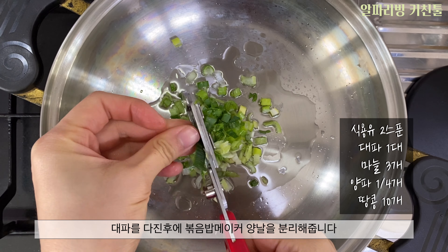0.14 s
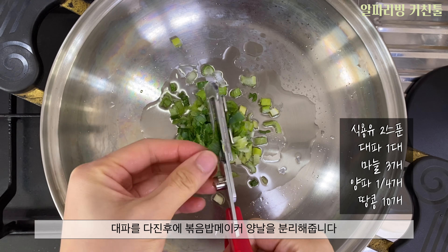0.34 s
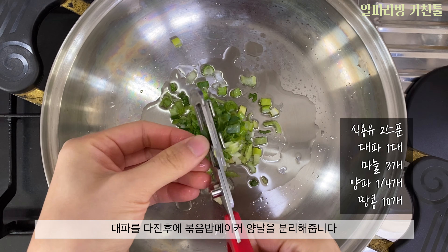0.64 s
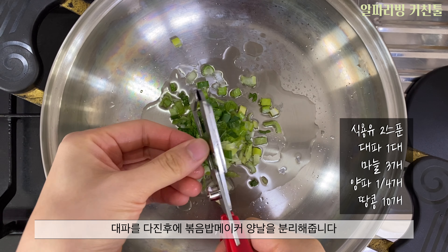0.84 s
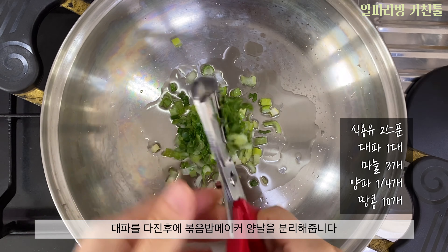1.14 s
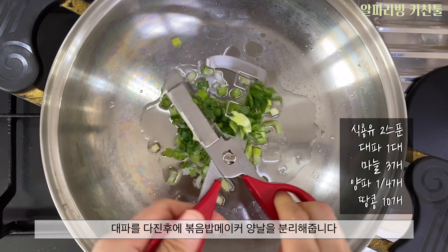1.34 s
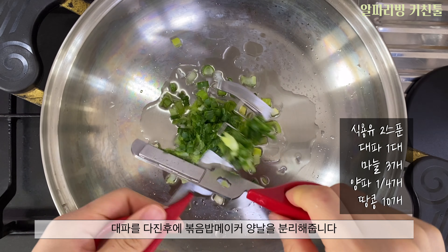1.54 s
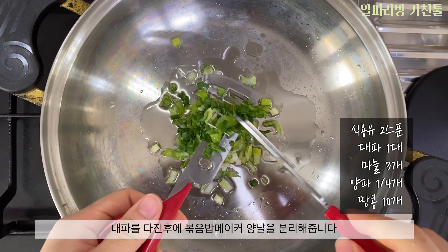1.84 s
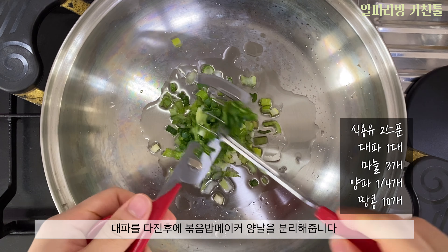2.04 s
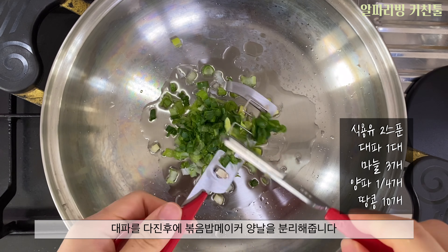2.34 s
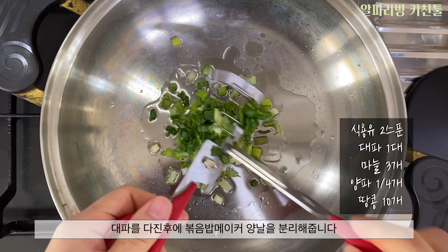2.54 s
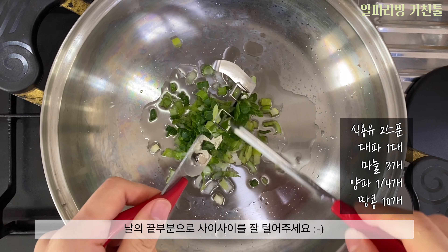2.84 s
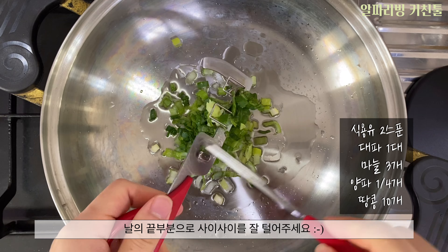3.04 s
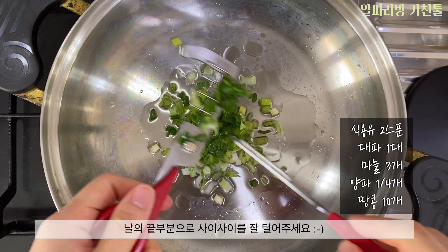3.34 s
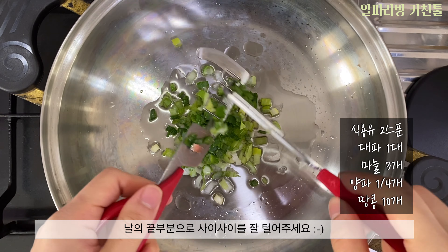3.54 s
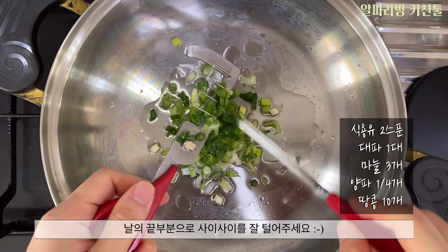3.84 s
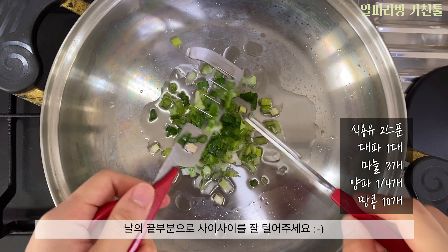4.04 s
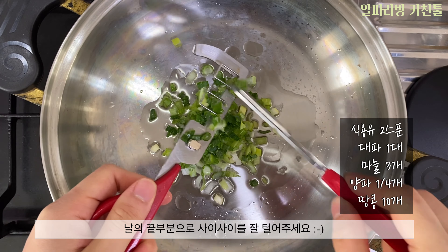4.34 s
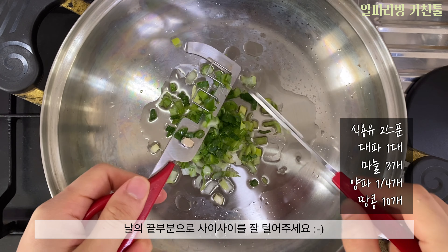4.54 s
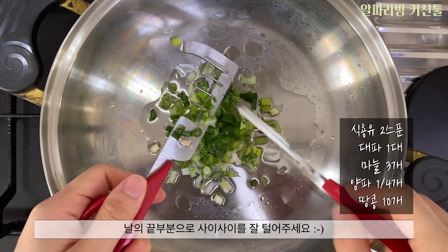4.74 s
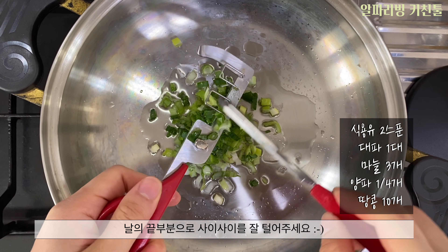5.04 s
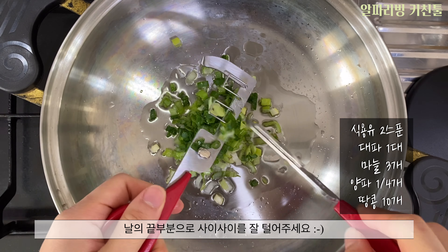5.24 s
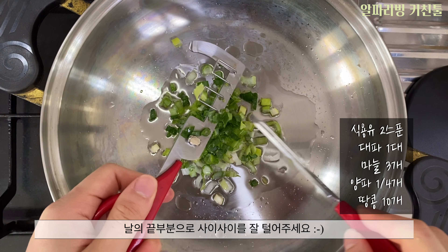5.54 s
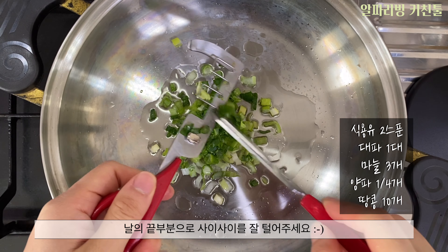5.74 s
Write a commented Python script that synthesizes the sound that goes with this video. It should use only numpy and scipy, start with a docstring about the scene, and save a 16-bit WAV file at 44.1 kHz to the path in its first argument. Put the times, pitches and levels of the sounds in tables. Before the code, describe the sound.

Kitchen scissors softly snip green onion, then their separated steel blades tap and scrape together over a pot, above a faint hum.

```python
"""Kitchen scissors snip softly through green onion over a steel pot. They come apart, and one blade is
tapped and scraped along the other to shake the pieces off: each contact rings the steel, and the pot
and the room throw it back. Underneath sit a faint appliance hum, a rustle of hands and a few dull,
distant knocks. Near the end a low thud comes through the counter."""
import sys
import numpy as np
from scipy import signal
from scipy.fft import rfft, irfft, next_fast_len
from scipy.io import wavfile
from scipy.ndimage import uniform_filter1d

SR = 44100
rng = np.random.default_rng(int(sys.argv[2]) if len(sys.argv) > 2 else 0)


def bounce(signal):
    """Save signal as a 16-bit WAV file at the path given by the first command-line argument."""
    frames = np.transpose(np.atleast_2d(signal))
    limited = np.clip(frames, -1, 1)
    pcm = np.round(limited * 32767).astype(np.int16)
    wavfile.write(sys.argv[1], SR, pcm)


N = 260190

# steel meeting steel: start_s, level_db, low_ring_db, tip_brightness_db
BLADE_TAPS = [(0.1442, -51, 0, -16), (.147, -49, 7, 17), (0.1555, -45.5, 2.5, 16), (0.364, -57.5, 5.5, -16),
              (.378, -47.5, 5, 2), (0.5353, -59.5, 9, -6), (.579, -49, 2, -2), (0.5903, -50, 11, 11),
              (.717, -55.5, 2, -10), (.7313, -47.5, 1, 0), (.951, -60, -5, -1), (0.969, -56.5, -3.5, -3),
              (.977, -49, 5, 12), (0.9894, -42.5, -0.5, 3), (1.117, -41, -1, 10), (1.1563, -44.5, 1.5, -6),
              (1.2792, -37.5, 0, -8.5), (1.459, -33.5, 7, -8), (1.4816, -48, 5, -4), (1.519, -48.5, 7, -6),
              (1.702, -23.5, 5, 5.5), (1.7276, -20, 3, 1), (1.8705, -49.5, 3, -2), (1.9882, -35, -5.5, 0.5),
              (2.0168, -51, -5, -1), (2.0342, -28, -1, 1), (2.129, -56.5, -11, -15),
              (2.1457, -28.5, -10.5, -0.5), (2.1671, -31, -9, -0.5), (2.2521, -17, -4, 0.5),
              (2.3801, -44, 2.5, 9), (2.3965, -18, -3, 1), (2.4033, -34.5, 4.5, 7), (2.415, -41, -10, 0),
              (2.496, -56.5, 11.5, 10), (2.5014, -47.5, -1, 6), (2.519, -19.5, -4, 5.5),
              (2.622, -53, 14.5, 8), (2.628, -57, 4, 4.5), (2.6442, -19, 1.5, -3.5), (2.729, -45, -12, 6),
              (2.7386, -45, -13, -2), (2.7529, -31, 2.5, 2), (2.8498, -44, 1, 6), (2.8721, -37, -9.5, 9),
              (3.0075, -23.5, -5, 2), (3.0428, -43.5, -1.5, -8.5), (3.1461, -43.5, -8, -2),
              (3.157, -44.5, 2.5, 1), (3.1976, -52.5, 10, 15), (3.205, -57, 3, 17), (3.2947, -32, -12.5, 5),
              (3.3166, -23.5, -6.5, 5.5), (3.4296, -28, 4, -6.5), (3.508, -53, 4, -3),
              (3.515, -41.5, 1, 5.5), (3.5433, -18.5, -5, -4.5), (3.6497, -18.5, -4.5, 1.5),
              (3.6725, -32, -5.5, -1), (3.768, -40, 7.5, -6), (3.8928, -36, 5, -15),
              (3.921, -40.5, -2, -21), (3.9981, -46, 9, -10.5), (4.1248, -18.5, -6, -6.5),
              (4.155, -45, -18, -4.5), (4.238, -21.5, -7.5, -1.5), (4.3523, -49, 4.5, -7),
              (4.4571, -44, 5.5, -11), (4.4786, -49, -1, 8), (4.4847, -43.5, -6, 0),
              (4.5913, -16.5, -7.5, 0.5), (4.704, -19.5, -7, 1.5), (4.8209, -38.5, 3.5, -7),
              (4.8294, -36, -17, 18), (4.837, -30, -11, -0.5), (4.9285, -44.5, -9.5, 3),
              (5.0502, -50.5, -8, -6.5), (5.07, -17.5, -13, -3), (5.1743, -48.5, -8.5, -4),
              (5.2078, -40, 7.5, 10), (5.2957, -55, 1, 2), (5.3343, -18.5, -12, -2),
              (5.4597, -47.5, -4, -4.5), (5.476, -19, -14, -0.5), (5.5896, -48, -7, -10),
              (5.5995, -49, -7.5, 2), (5.73, -14, -12, -1), (5.8524, -38, -11, -3),
              (5.8576, -26, -13.5, -6), (5.8645, -28, -12, 3)]
# how alike distant sound is left and right: frequency_hz, correlation
FAR_CORRELATION = [(60, 0.99), (180, 1), (350, 0.57), (600, 0.59), (1500, -0.5), (5000, .15),
                   (15000, -0.35)]


def amp(db):
    return 10 ** (np.asarray(db) / 20)


def unit_rms(x):
    return x / np.sqrt(np.mean(x ** 2) + 1e-20)


def curve_at(points, hz):
    """Read a breakpoint curve along a log frequency axis."""
    points_hz, value = np.transpose(points)
    return np.interp(np.log(hz + 1), np.log(points_hz + 1), value)


def add(mix, start_s, sound):
    part = mix[..., round(start_s * SR):][..., :sound.shape[-1]]
    part += sound[..., :part.shape[-1]]


def stereo_pair(a, b, correlation):
    """Blend two independent noises into a partly alike left and right."""
    return np.array([a, correlation * a + np.sqrt(1 - correlation ** 2) * b])


def diffuse_noise(colour, patchy_db):
    """Wide noise with patches that swell and fade across its spectrum."""
    frames, hz = N // 256 + 5, np.fft.rfftfreq(1024, 1 / SR)
    a, b, c, d, patches = rng.standard_normal((frames, 513, 5)).T
    patches = unit_rms(uniform_filter1d(uniform_filter1d(patches, size=10, axis=0), size=10, axis=1))
    spectra = stereo_pair(a + 1j * b, c + 1j * d, curve_at(FAR_CORRELATION, hz)[:, None])
    spectra *= amp(curve_at(colour, hz)[:, None] + patchy_db * patches)
    return unit_rms(signal.istft(spectra, nperseg=1024, noverlap=768)[1][:, :N])


def room_tone():
    """The low, airy bed of the kitchen."""
    # colour of the air: frequency_hz, gain_db
    air_colour = [(18, -61.5), (30, -59.5), (118, -2), (228, -3.5), (279, -12.5), (388, -16.5), (572, -10),
                  (1320, -20), (1760, -18.5), (3070, -29.5), (4000, -25.5), (5200, -30), (8800, -120)]
    return amp(-66.5) * diffuse_noise(air_colour, patchy_db=3.5)


def appliance_hum():
    """An appliance hums in wavering lines: noise through narrow resonances."""
    # hum lines: pitch_hz, bandwidth_hz, level_db
    hum_lines = [(283.8, 8.2, -65.5), (576, 18, -79.5), (667.7, 20, -82)]
    out = np.zeros(N)
    for pitch_hz, bandwidth_hz, level_db in hum_lines:
        pole = np.exp((2j * pitch_hz - bandwidth_hz) * np.pi / SR)
        line = signal.lfilter([1], [1, -pole], rng.standard_normal(N)).real
        out += amp(level_db) * unit_rms(line)
    return out


def hand_rustle():
    """Hands and onion make a faint, gritty hiss that comes and goes."""
    # fader moves of the rustle: time_s, level_db
    fader = [(0.0, -73.5), (0.15, -78.5), (0.62, -77), (1.02, -91), (1.22, -72.5), (1.82, -87), (2.41, -80),
             (2.61, -79), (2.86, -83.5), (3.04, -83), (3.53, -70), (4.37, -71), (5.01, -83), (5.26, -64.5),
             (5.39, -78), (5.55, -95), (5.78, -83), (5.9, -70)]
    # colour of the hiss: frequency_hz, gain_db
    hiss_colour = [(880, -39.5), (1500, -18.5), (2790, -29), (3420, 2), (3780, -13), (6090, 1.5),
                   (14000, -2), (17000, -8.5)]
    level_db = np.interp(np.arange(N) / SR, *np.transpose(fader))
    grit_db = 2 * unit_rms(uniform_filter1d(rng.standard_normal(N), size=150))
    return amp(level_db + grit_db) * diffuse_noise(hiss_colour, patchy_db=1.5)


def distant_knocks():
    """Dull knocks across the kitchen: puffs of band noise with a quick rise and a roomy fall."""
    # knock cues: start_s, level_db, centre_hz, width_octaves, rise_s, t60_s
    knocks = [(.185, -50, 1310, 1.26, 0.011, 0.11), (0.672, -52.5, 122, 0.55, 0.006, 0.29),
              (.802, -45, 970, 1.75, 0.0061, 0.14), (.805, -43, 286.5, 0.09, 0.0094, 0.18),
              (.808, -49, 2200, 0.17, 0.0047, 0.11), (1.5, -56, 601, 0.12, 0.0029, 0.27),
              (1.8, -65, 625, 0.38, 0.0078, 0.11), (2.701, -59, 510, 0.28, 0.0044, 0.046),
              (2.271, -45.5, 2920, 1.8, 0.047, 0.3), (5.12, -52.5, 390, 1.8, 0.028, 0.44),
              (5.237, -39.5, 1604, 1.43, 0.0055, 0.21), (5.489, -52.5, 118, 1.17, 0.029, 0.97),
              (5.56, -41.5, 687, 1.1, 0.035, 0.19), (5.742, -42, 510, 1.44, 0.0081, 0.22)]
    out, t = np.zeros((2, N)), np.arange(16384) / SR
    hz = np.fft.rfftfreq(len(t), 1 / SR) + 1
    correlation = curve_at(FAR_CORRELATION, hz)
    for start_s, level_db, centre_hz, width_octaves, rise_s, t60_s in knocks:
        noise = stereo_pair(*rfft(rng.standard_normal((2, len(t)))), correlation)
        band = np.exp(-(np.log2(hz / centre_hz) / width_octaves) ** 2)
        envelope = amp(level_db - 60 * t / t60_s) * (1 - np.exp(-(t / rise_s) ** 2))
        add(out, start_s, envelope * unit_rms(irfft(band * noise)))
    return out


def counter_thud(start_s=5.7385, level_db=-28):
    """A soft blow rings the low modes of the counter, dead centre."""
    # counter modes: pitch_hz, gain_db, t60_s
    modes = [(125, -3.5, 0.38), (172.7, 4.5, 0.26), (211.3, -5, 0.32), (273, -6, 0.29), (531, -18, .15)]
    out, t = np.zeros(N), np.arange(12000) / SR
    ring = sum(amp(db - 60 * t / t60_s) * np.sin(2 * np.pi * hz * t) for hz, db, t60_s in modes)
    attack = 1 - np.exp(-t / .003)
    add(out, start_s, amp(level_db) * ring * attack)
    return out


def room_reverb(sound, level_db=-14.5, predelay_s=.008):
    """The room answers with dense echoes whose lows outlast the treble."""
    # room decay: frequency_hz, t60_s
    decay = [(500, 0.76), (2500, 0.17), (7000, 0.15), (15000, 0.17)]
    hz, t, spectra = signal.stft(rng.standard_normal((2, SR)), SR, nperseg=128)
    spectra *= amp(-60 * t / curve_at(decay, hz)[:, None])
    echoes = signal.istft(spectra, SR, nperseg=128)[1]
    echoes *= np.clip(np.arange(echoes.shape[1]) / (predelay_s * SR) - 1, 0, 1)
    echoes *= amp(level_db) / np.linalg.norm(echoes[0])
    return signal.oaconvolve(sound.mean(0)[None], echoes, axes=1)[:, :N]


def pot_reflections(size, level_db=-7.5, t60_s=.039):
    """Spectrum of the steel pot's quick splash of echoes, new for each place of the blades."""
    t = np.arange(4000) / SR
    envelope = amp(-60 * t / t60_s) * np.clip(t / .0023, 0, 1)
    echoes = stereo_pair(*rng.standard_normal((2, len(t))), correlation=.82) * envelope
    return amp(level_db) * rfft(echoes / np.linalg.norm(echoes[0]), size)


def ring_blades(contact, knock_db, low_db, body_db, tip_db):
    """A contact rings four groups of blade modes over the pot; grip and place shift them each time."""
    # blade modes, from dull knock to bright tip: pitch_hz, gain_db, t60_s
    knock_modes = [(1571, -0.5, 0.016), (2173, 3.5, 0.0054), (2653, 3, 0.0089), (3410, 0, 0.0026)]
    low_modes = [(4394, -4.5, 0.017), (5012, 0.5, 0.011), (5360, -1.5, 0.0032), (5926, -5.5, 0.0044),
                 (6715, -4.5, 0.0079), (7170, -5, 0.0031)]
    body_modes = [(8310, -10.5, 0.0039), (9690, -8, 0.013), (9820, -5, 0.005), (10366, -4.5, 0.0074),
                  (10900, -10.5, 0.0023)]
    tip_modes = [(12260, -12.5, .004), (13350, -7.5, 0.0059), (13900, -6.5, 0.0089), (13750, -17, 0.0034),
                 (15100, -13.5, .007)]
    groups = [(knock_modes, knock_db), (low_modes, low_db), (body_modes, body_db), (tip_modes, tip_db)]
    size = next_fast_len(len(contact) + 6000)
    hz = np.fft.rfftfreq(size, 1 / SR)
    force, steel = rfft(contact, size), 0
    # hard steel spreads its force evenly over the treble
    force /= (uniform_filter1d(abs(force) ** 2, size=25) + 1e-12) ** .4
    force /= (1 - 1j * 1200 / (hz + 1)) ** 2  # a small blade sends out no bass
    for modes, group_db in groups:
        pitch_hz, gain_db, t60_s = np.transpose(modes)[:, :, None]
        detune, gain_jitter = rng.standard_normal((2, len(modes), 1))
        offset_hz = hz - pitch_hz * (1 + .015 * detune)
        resonance = 1 / (1 + 2j * np.pi * offset_hz * t60_s / 9.23) ** 2  # two poles: steep skirts
        ring = force * (amp(gain_db + 2 * gain_jitter) * resonance).sum(0)
        steel += amp(group_db) * ring / np.linalg.norm(ring)
    left_lead_s = 2.2e-5
    pan = np.exp(1j * np.pi * hz * left_lead_s * np.array([[1], [-1]]))
    spectrum = steel * pan * (1 + pot_reflections(size))
    return irfft(spectrum, size)[:, :size - 1500] * np.sqrt(size / 2)


def blade_slides():
    """Blades scrape on each other and through the onion in a gritty train of contacts."""
    # strokes: start_s, length_s, level_db
    slides = [(.124, 0.066, -60), (0.401, 0.054, -69.5), (0.553, 0.081, -67.5), (0.676, 0.065, -72),
              (0.979, 0.037, -62.5), (1.086, 0.077, -73.5), (1.278, 0.025, -63), (1.329, 0.17, -76),
              (1.461, 0.082, -60), (1.613, 0.088, -81.5), (1.698, 0.054, -52.5), (1.959, .06, -62),
              (2.16, .015, -63), (2.25, 0.09, -77), (2.396, 0.024, -45.5), (2.514, 0.02, -41.5),
              (2.65, .024, -68), (2.68, 0.057, -69), (3.017, 0.039, -52), (3.083, 0.062, -67.5),
              (3.498, 0.038, -59.5), (3.549, 0.033, -60), (3.65, 0.016, -36), (3.768, 0.023, -56.5),
              (3.888, 0.033, -44), (4.001, 0.031, -61.5), (4.115, 0.036, -48.5), (4.237, .02, -53),
              (4.362, 0.12, -79.5), (4.456, .029, -59), (4.593, 0.022, -51), (4.704, 0.03, -42.5),
              (4.82, 0.013, -42), (4.918, 0.051, -61.5), (5.06, .045, -61), (5.343, 0.045, -59),
              (5.48, 0.032, -59), (5.733, 0.044, -47), (5.852, .023, -48)]
    out = np.zeros((2, N))
    for start_s, length_s, level_db in slides:
        nearest_tap = min(BLADE_TAPS, key=lambda tap: abs(tap[0] - start_s))
        low_ring_db = .6 * nearest_tap[2]
        samples = round(length_s * SR)
        grit = amp(1.5 * np.minimum(rng.exponential(1, 200), 4)).repeat(40)[:samples]
        stroke = signal.windows.tukey(samples, .5) * grit * rng.standard_normal(8000)[:samples]
        scrape = ring_blades(stroke, knock_db=.65 * low_ring_db - 11, low_db=low_ring_db - 4.5,
                             body_db=-4, tip_db=-6)
        add(out, start_s, amp(level_db) * np.sqrt(samples) * scrape)
    return out


def blade_taps(apart_s=1.8, firm_tap_db=-25):
    """Steel strikes steel: one short burst of contacts sets the blades ringing."""
    out, t = np.zeros((2, N)), np.arange(400) / SR
    for start_s, level_db, low_ring_db, brightness_db in BLADE_TAPS:
        contact_s = .00038 * np.exp(.19 * rng.standard_normal())
        burst = rng.standard_normal(len(t)) * np.exp(-t / contact_s) * (1 - np.exp(-t * 5000))
        # the dull knock goes with the low ring and against the bright tip
        knock_db = -18.5 + .65 * low_ring_db - .2 * brightness_db
        knock_db += .14 * (firm_tap_db - level_db)  # soft taps knock more
        if start_s < apart_s:
            knock_db -= 5  # joined halves knock less
        click = ring_blades(burst, knock_db, low_db=low_ring_db - 6.5,
                            body_db=-7 - brightness_db / 2, tip_db=-6 + brightness_db / 2)
        add(out, start_s - .0002, amp(level_db) * np.sqrt(150) * click)
    return out


def scene():
    """Close scissors and their room reverb, over the quiet kitchen."""
    scissors = blade_taps() + blade_slides()
    return (scissors + room_reverb(scissors) + hand_rustle() + distant_knocks() + counter_thud()
            + appliance_hum() + room_tone())


def record(dry):
    """The microphone drops the lowest bass and the very top of the treble."""
    low_cut = signal.butter(2, 60, "high", fs=SR, output="sos")
    high_cut = signal.firwin(511, 17100, window=("kaiser", 9), fs=SR)
    return signal.oaconvolve(signal.sosfilt(low_cut, dry), high_cut[None], "same")


dry = scene()
out = record(dry)
bounce(out)
```